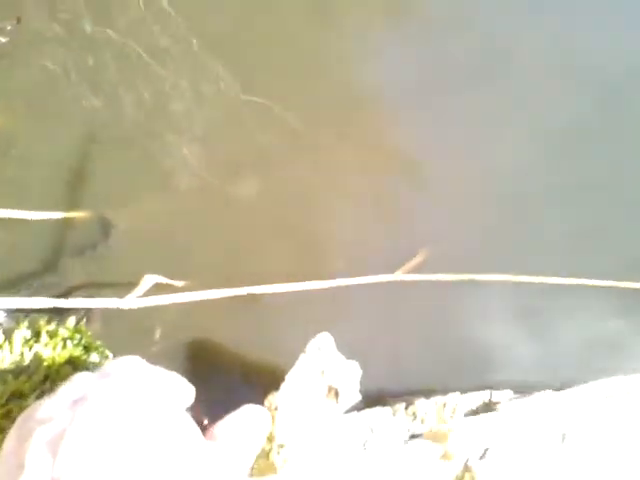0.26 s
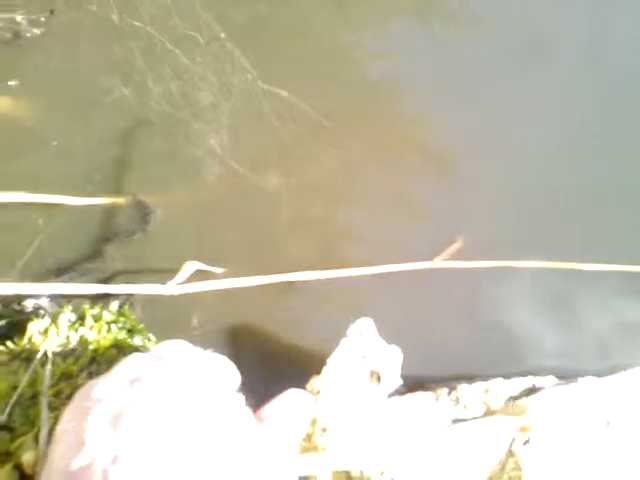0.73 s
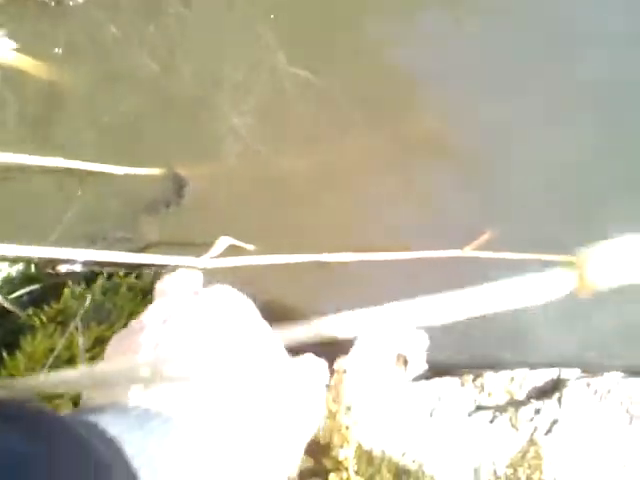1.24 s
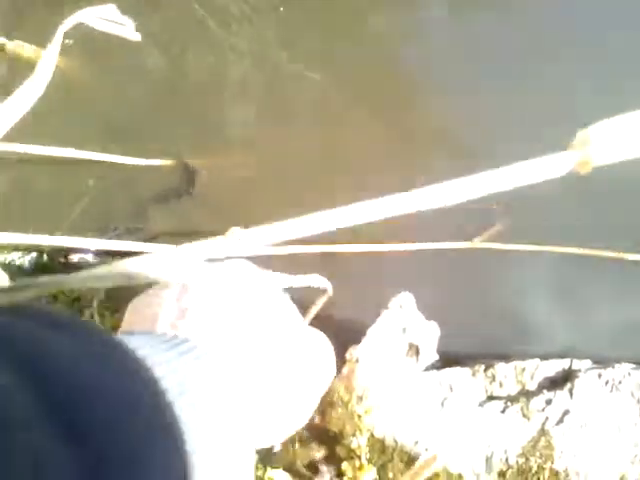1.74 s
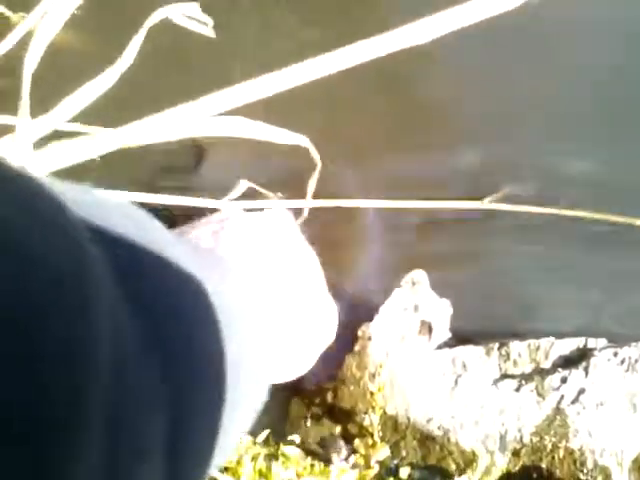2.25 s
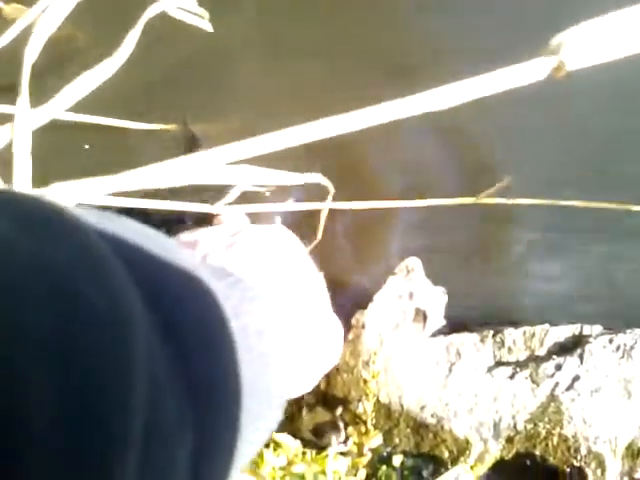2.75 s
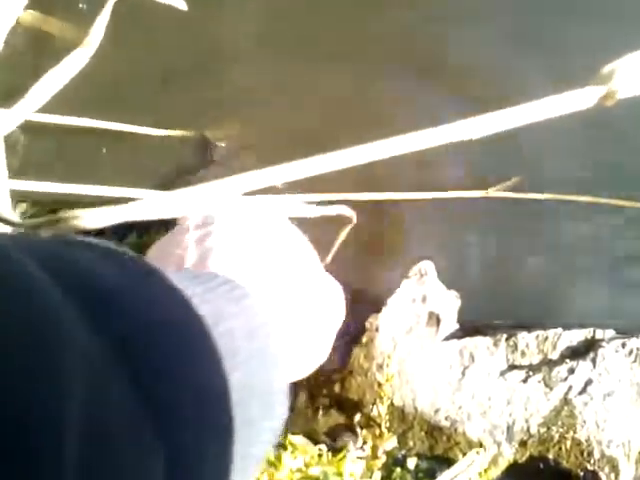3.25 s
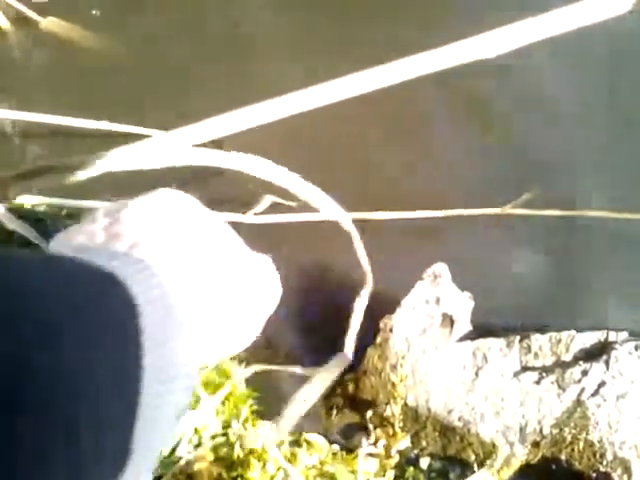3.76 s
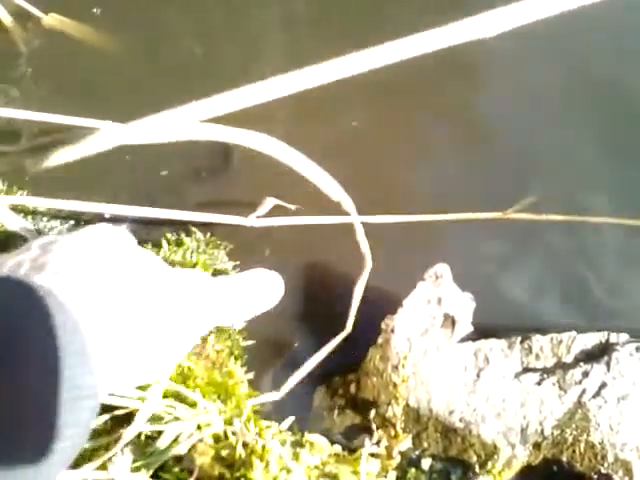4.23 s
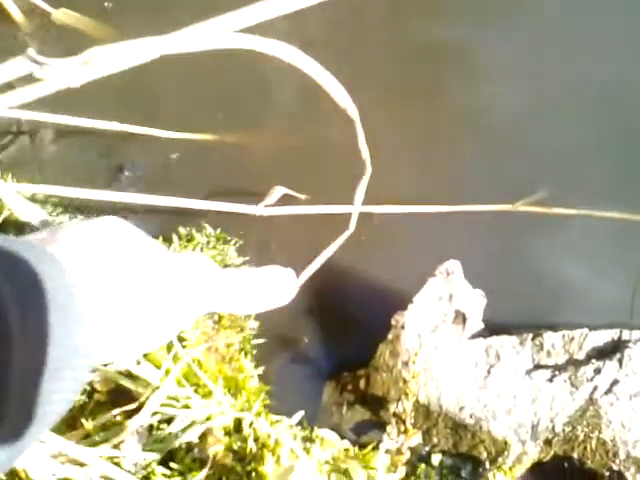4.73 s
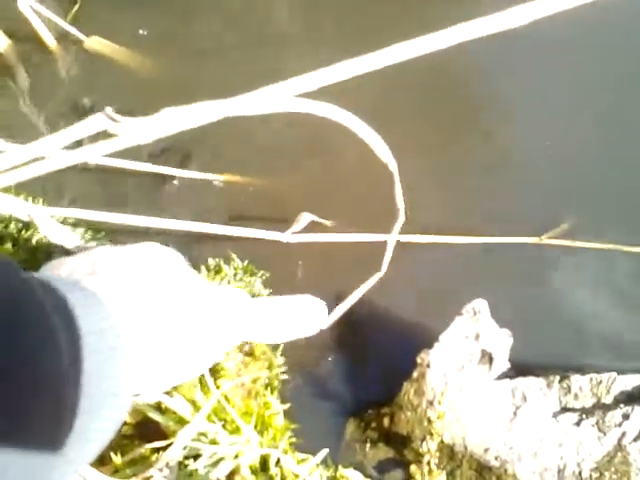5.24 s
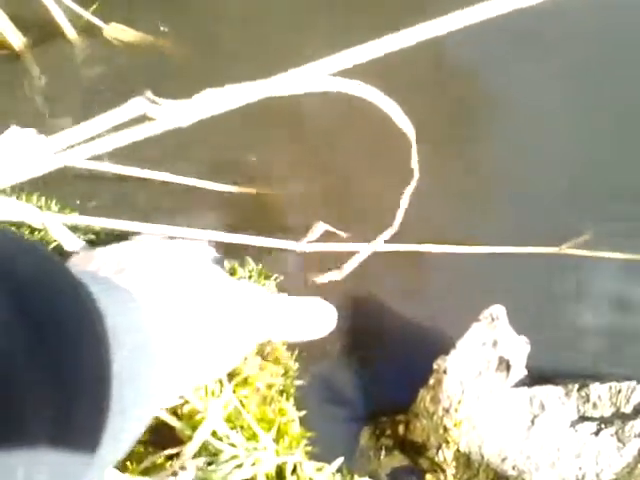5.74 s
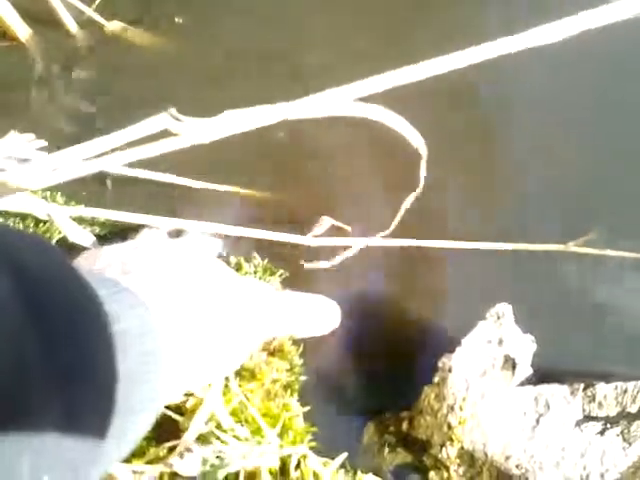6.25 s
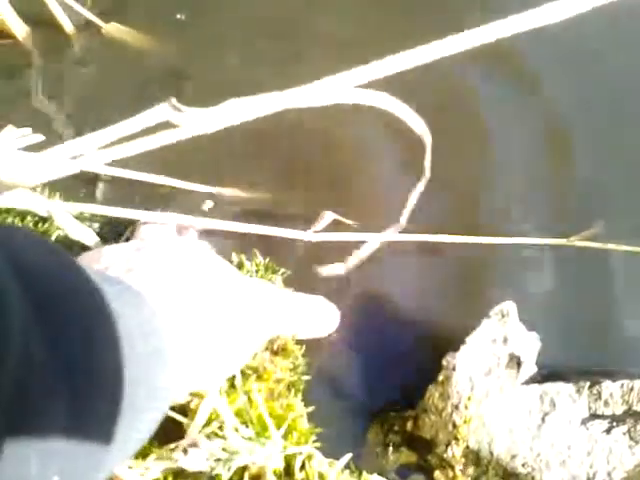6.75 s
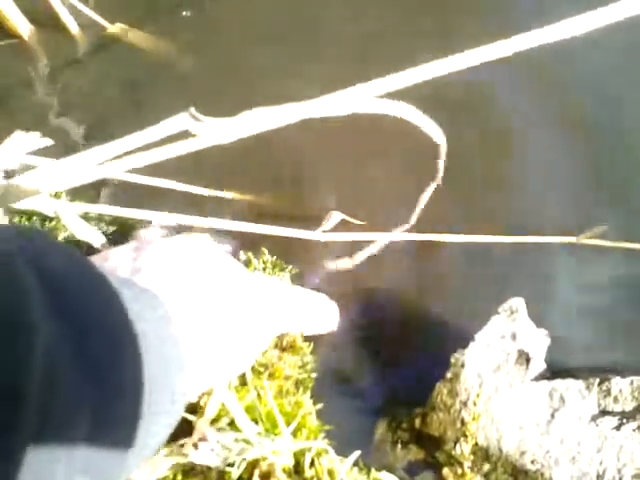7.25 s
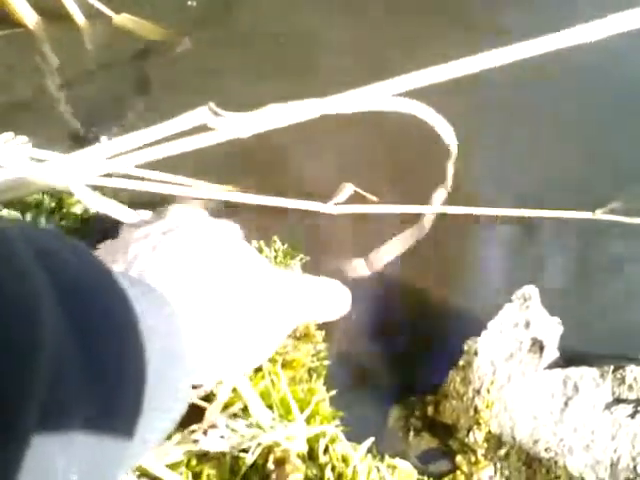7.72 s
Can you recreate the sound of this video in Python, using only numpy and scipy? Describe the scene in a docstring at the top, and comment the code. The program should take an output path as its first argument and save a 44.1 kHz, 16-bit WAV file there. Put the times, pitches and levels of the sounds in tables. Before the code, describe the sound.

Close, busy rustling of dry leaves and cloth opens the scene, with one especially sharp stem snap and a cluster of taps on the device body. Then frogs croak continuously, each a low, rapid, rounded rattle, nearer ones overlapping a blurred chorus farther off. Occasional plips of water and dry ticks punctuate them. The place is a calm garden pond with soft background hush, heard through a slightly dull handheld microphone.

```python
"""First a hand rustles through dry plants while sparrows chirp far off; then frogs purr in a pond.
Each croak is a quick train of soft knocks, each a short pulse followed by a ringing vocal sac.
A low purring blur thickens the opening rustle and later is farther frogs.
Noise gives the garden hush, breeze and rustle; short wave packets are the snapping stems.
Damped rings are the drips and the finger taps; stacks of harmonics are the chirps."""
import sys
import numpy as np
from scipy import signal
from scipy.fft import rfft, irfft
from scipy.io import wavfile
from scipy.ndimage import uniform_filter1d

SR = 44100
rng = np.random.default_rng(int(sys.argv[2]) if len(sys.argv) > 2 else 0)


def unload_wav(signal):
    """Save mono or channel-first audio to the path in sys.argv[1] as 16-bit WAV at rate SR, clipped to [-1, 1]."""
    wavfile.write(
        sys.argv[1],
        SR,
        np.round(np.clip(np.atleast_2d(signal).T, -1, 1) * 32767).astype(np.int16),
    )


N = 352359  # length in samples, about 8 s


def gain_of(db):
    """Turns decibels into a plain multiplier."""
    return 10 ** (np.asarray(db) / 20)


def evened(x):
    """Scales a sound to an average (rms) strength of 1."""
    return x / np.sqrt(np.mean(x ** 2) + 1e-20)


def follow(rows, axis):
    """Draws straight lines through one column of a table, giving a value for every sample."""
    rows = np.array(rows)
    return np.interp(np.arange(N) / SR, rows[:, 0], rows[:, axis])


def add(mix, start_s, sound):
    """Mixes a sound in at a given second."""
    part = mix[max(round(start_s * SR), 0):][:len(sound)]
    part += sound[:len(part)]


def coloured(x, points):
    """Filters x through a curve of level against frequency, then scales it to rms 1."""
    point_hz, point_db = np.transpose(points)
    hz = np.fft.rfftfreq(len(x), 1 / SR)
    db = np.interp(np.log(hz + 1), np.log(point_hz + 1), point_db)
    return evened(irfft(rfft(x) * gain_of(db), len(x)))


def decay(t, t60):
    """A fade that loses 60 dB in t60 seconds."""
    return gain_of(-60 * t / t60)


def ring(hz, t60, rise_s, glide=0.):
    """A damped ring with a soft start and a peak envelope of 1; its pitch can drift as it dies."""
    t = np.arange(round(2 * t60 * SR) + 20) / SR
    shape = (1 - np.exp(-t / rise_s)) * decay(t, t60)
    return shape / shape.max() * np.sin(2 * np.pi * hz * t * (1 + glide * t / t60))


# Colour of the garden hush. Each row: frequency in Hz, relative level per Hz in dB.
GARDEN_COLOUR = [(20, -11), (60, -4), (130, -4), (250, -3), (450, -7), (1000, -12.5), (1650, -7.5),
                 (2000, -14), (2500, -31), (4000, -24), (6200, -28), (7300, -30)]
# Strength of the breeze. Each row: time in seconds, level in dB before the gusts.
BREEZE_LEVEL = [(0, -57.5), (.98, -46), (1.3, -53), (3.6, -53.5), (4.7, -54), (5.5, -58), (5.75, -52),
                (6.27, -59), (6.5, -56), (7.4, -54.5), (7.99, -46.5)]
# Colour of the breeze's rumble. Each row: frequency in Hz, relative level per Hz in dB.
RUMBLE_COLOUR = [(10, -0.5), (25, -7.5), (60, -6), (110, -16), (250, -39)]
GARDEN_DB, HUSH_SWELL_DB = -48.5, 0.42  # usual level, typical swing around it
GUST_DB = 1  # typical swing of the gusts


def garden():
    """Far traffic, air and microphone hiss as one swelling noise; a breeze rumbles at the microphone."""
    swell = evened(uniform_filter1d(rng.standard_normal(N), 8000))
    hush = gain_of(GARDEN_DB + HUSH_SWELL_DB * swell) * coloured(rng.standard_normal(N), GARDEN_COLOUR)
    gusts = evened(uniform_filter1d(uniform_filter1d(rng.standard_normal(N), 4000), 4000))
    breeze = gain_of(follow(BREEZE_LEVEL, axis=1) + GUST_DB * gusts)
    return hush + breeze * coloured(rng.standard_normal(N), RUMBLE_COLOUR)


# Level of a low purring blur: under the opening rustle it thickens the sleeve's scrape, later it
# is farther frogs. Each row: time in seconds, level in dB.
BLUR_LEVEL = [(0, -83), (.29, -43.5), (.7, -41.5), (.9, -58), (1.8, -51), (2.2, -52.5), (2.67, -76),
              (3.05, -59.5), (3.83, -66.5), (4.6, -49.5), (5.09, -49.5), (5.5, -48), (5.67, -62),
              (6.45, -51.5), (6.7, -45.5), (7.25, -59), (7.37, -46), (7.48, -89), (7.99, -49.5)]


def purring_blur(count=7):
    """Several trains of frog-like knocks, each with its own pitch and pace, swell and fade."""
    out, t = np.zeros(N), np.arange(N) / SR
    for pick, (pace, pitch, phase, turn) in enumerate(rng.random((count, 4))):
        # a knock falls each time this count, with its slow wobble, reaches a new whole number
        knock_count = t * (22 + 16 * pace) + 1.5 * np.sin(2 * np.pi * (.3 * t + phase))
        beats = np.diff(np.floor(knock_count), prepend=0) > 0
        breath = 0.12 + 1.9 * np.sin(np.pi * (t * (.5 + 0.382 * turn) + phase)) ** 2
        hz = 450 + 190 * (pick + pitch) / count
        out += signal.oaconvolve(beats * breath, knock(hz, 0.037, sac_db=0.5))[:N]
    return gain_of(follow(BLUR_LEVEL, axis=1)) * evened(out)


# One table a chirp. Each row: time in seconds, level in dB, pitch of the strong harmonic in Hz,
# level of the neighbouring harmonics in dB.
CHIRP_CURVES = [
    [(.012, -46, 2870, -9), (.026, -43, 2990, -20), (.036, -63, 2640, -6), (.062, -55, 3080, -8)],
    [(.184, -51, 2460, 0), (.198, -42, 3240, -14), (.208, -50.5, 3380, -13), (.226, -52, 3020, 2)],
    [(5.022, -51, 2870, -1), (5.04, -50, 3105, -2), (5.064, -43, 3236, -16), (5.078, -46, 2820, -6),
     (5.092, -45, 2440, -17)],
    [(7.912, -56, 3150, 4), (7.93, -54, 3320, 2), (7.955, -50.5, 3330, 2), (7.97, -44, 3440, -17),
     (7.988, -49, 2920, -6)],
]
# For each chirp: which harmonic, counted from 1, carries the pitch.
STRONG_HARMONIC = [8, 8, 4, 9]
# For each neighbour: how many harmonics it lies above the strong one (minus means below).
NEIGHBOUR_STEPS = (-1, 1, 2, 3)
# For each neighbour, in the same order: its level in dB, added to the chirp's own column.
NEIGHBOUR_LEVELS = [-6.5, -4, -9, -10]


def sparrows():
    """A harsh whistle, one harmonic standing out of a stack of weaker ones, smeared by echoes."""
    out = np.zeros(N)
    for rows, order in zip(CHIRP_CURVES, STRONG_HARMONIC):
        times, *columns = np.transpose(rows)
        t = np.arange(times[0], times[-1], 1 / SR)
        db, hz, stack_db = (np.interp(t, times, column) for column in columns)
        turn = 2 * np.pi * np.cumsum(hz) / SR / order  # phase of the lowest harmonic
        stack = sum(gain_of(side_db) * np.sin((order + step) * turn)
                    for step, side_db in zip(NEIGHBOUR_STEPS, NEIGHBOUR_LEVELS))
        # an unsteady voice
        rasp = 1 + .4 * evened(uniform_filter1d(rng.standard_normal(4000), 80))[:len(t)]
        tone = rasp * (np.sin(order * turn) + gain_of(stack_db) * stack)
        add(out, times[0], np.sqrt(2) * tone * gain_of(db) * signal.windows.tukey(len(t), .3))
    echoes = rng.standard_normal(6000) * decay(np.arange(6000) / SR, .3)
    echoes = echoes / np.linalg.norm(echoes)
    return out + gain_of(-2.0) * signal.oaconvolve(out, echoes)[:N]


# Drips. Each row: start in seconds, peak level in dB, nominal pitch in Hz,
# time to fade by 60 dB in seconds.
DRIP_RINGS = [(2.159, -30.5, 1100, 0.018), (2.492, -35, 1760, 0.019), (2.5168, -37, 2070, 0.032),
              (2.6522, -26, 1550, 0.018), (2.724, -22.5, 1150, 0.037), (3.05, -27, 2020, 0.011),
              (4.296, -35, 1400, 0.03), (4.589, -30, 1560, 0.01), (6.691, -21, 635, 0.033),
              (7.4198, -39, 1720, 0.061), (7.441, -18, 1562, 0.031), (7.9552, -21.5, 1197, 0.041)]


def drips():
    """Each drip traps an air bubble, which rings and rises slightly in pitch."""
    out = np.zeros(N)
    for s, db, hz, t60 in DRIP_RINGS:
        # starting a little under the nominal pitch
        add(out, s, gain_of(db) * ring(0.989 * hz, t60, 0.00026, glide=0.08))
    return out


# Faint lasting rustle. Each row: time in seconds, crackle of dry leaves in dB, scrape of the sleeve in dB.
LASTING_RUSTLE = [(0, -53, -50.5), (.75, -53.5, -48), (.85, -56.5, -54), (1.55, -60.5, -55),
                  (2.1, -57, -54), (2.35, -58.5, -56), (3.3, -60, -58), (3.85, -56, -52),
                  (4.05, -57, -56.5), (4.22, -62, -58.5), (4.9, -63.5, -58), (7, -64.5, -56.5),
                  (7.4, -62, -56.5), (7.99, -67, -58)]
# Sweeps through the plants. Each row: middle in seconds, half length (standard deviation of
# the bell shape) in seconds, leaves in dB, sleeve in dB.
HAND_SWEEPS = [(0.028, 0.048, -51.5, -39), (.15, .025, -50, -49), (0.23, 0.024, -47, -58),
               (0.301, 0.017, -42.5, -38.5), (0.353, 0.027, -52.5, -43.5), (.435, .035, -49.5, -38),
               (0.571, 0.044, -40.5, -34), (0.628, 0.016, -41.5, -44), (0.692, 0.05, -49.5, -44.5),
               (0.935, .025, -46, -51), (1.033, 0.037, -43, -47), (1.213, 0.1, -49.5, -53),
               (1.271, 0.0069, -41, -43), (1.44, .018, -45, -47), (2, 0.06, -55.5, -51.5),
               (4.344, 0.034, -48.5, -48.5), (5.815, 0.017, -53.5, -58)]


def hand(axis):
    """Strength of the leaves (1) or the sleeve (2): bell-shaped sweeps over the lasting rustle."""
    t = np.arange(N) / SR
    power = gain_of(follow(LASTING_RUSTLE, axis=axis)) ** 2
    for row in HAND_SWEEPS:
        bell = np.exp(-.5 * ((t - row[0]) / row[1]) ** 2)
        power += (gain_of(row[axis + 1]) * bell) ** 2
    return np.sqrt(power)


# Colour of the dry leaves. Each row: frequency in Hz, relative level per Hz in dB.
LEAF_COLOUR = [(1500, -18), (2500, -6.5), (3500, -0.5), (5000, 3), (6300, 8.5), (7300, 2.5), (8000, -40)]
# Colour of the scraping sleeve. Each row: frequency in Hz, relative level per Hz in dB.
SLEEVE_COLOUR = [(250, -26.5), (400, -6.5), (500, 0.5), (620, -12), (780, 0.5), (1000, -2.5), (1300, -7.5),
                 (2200, -9), (3200, -7.5), (4200, -17), (6000, -50.5)]
CRACKS_PER_S = 900  # on average


def rustle():
    """Tiny cracks of unequal size in a flickering hiss of leaves, and a lumpy scrape of cloth."""
    crack_sizes = gain_of(4.0 * np.minimum(rng.exponential(1, N), 4.5))
    cracks = crack_sizes * (rng.random(N) < CRACKS_PER_S / SR)
    flicker, lumps = (evened(uniform_filter1d(z, 350)) for z in rng.standard_normal((2, N)))
    crackle = .5 * evened(cracks * rng.standard_normal(N))
    leaves = crackle + gain_of(3.4 * flicker) * rng.standard_normal(N)
    sleeve = gain_of(1.6 * lumps + 1.0 * flicker) * rng.standard_normal(N)
    return hand(axis=1) * coloured(leaves, LEAF_COLOUR) + hand(axis=2) * coloured(sleeve, SLEEVE_COLOUR)


TWIGS_PER_S = 30
TWIG_OVER_DB, TWIG_SPREAD_DB = 21, 4  # level above the leaves' strength, and its random scatter
TWIG_HZ, TWIG_SCATTER_HZ, TWIG_WIDTH_HZ = 4670, 800, 2300  # usual centre, its scatter, spread


def twigs():
    """Rows of small snaps at random moments, louder when the hand stirs the leaves more."""
    count = round(TWIGS_PER_S * N / SR)
    times = rng.random(count) * (N - 1) / SR
    level_luck, pitch_luck = rng.standard_normal((count, 2)).T
    leaves_db = 20 * np.log10(hand(axis=1)[(times * SR).astype(int)])
    db = leaves_db + TWIG_OVER_DB + TWIG_SPREAD_DB * level_luck
    return list(zip(times, db, TWIG_HZ + TWIG_SCATTER_HZ * pitch_luck, np.full(count, TWIG_WIDTH_HZ)))


# Snapping stems. Each row: middle of the snap in seconds, level in dB, centre pitch in Hz,
# frequency spread in Hz (a larger spread makes a shorter snap).
STEM_SNAPS = [(0.1502, -22.5, 3640, 1770), (0.1808, -22, 4440, 1640), (0.2262, -21.5, 5310, 1280),
              (0.2655, -20, 4850, 1560), (0.291, -30, 5120, 1310), (0.2993, -8.5, 5800, 1040),
              (0.3013, -25, 4850, 1620), (0.3353, -15, 5660, 670), (0.341, -1, 4200, 1550),
              (0.347, -22, 4990, 1350), (0.449, -21.5, 5000, 1570), (0.5722, -26, 4650, 1850),
              (0.603, -10, 5330, 1250), (0.619, -12, 5510, 1620), (0.62, -18, 5290, 1660),
              (0.6771, -23, 4830, 1800), (0.91, -22.5, 5570, 1330), (0.9694, -21, 5600, 1310),
              (0.9868, -18, 4490, 1360), (1.0493, -29, 6000, 1470), (1.088, -23.5, 5450, 1210),
              (1.1924, -22, 4830, 1270), (1.2013, -7.5, 4950, 1310), (1.2766, -21, 4620, 1620),
              (1.483, -21, 3720, 1720), (1.9972, -25, 2940, 1730), (2.1543, -24.5, 4660, 1240),
              (2.1897, -20.5, 3830, 2180), (2.4675, -17.5, 4600, 380), (2.7412, -27.5, 6150, 910),
              (3.4753, -15, 4300, 1250), (4.8954, -18.5, 4160, 1910), (5.3158, -30.5, 5450, 1310),
              (6.6976, -22, 4880, 1040), (6.7, -20.5, 3100, 1650), (6.943, -31, 5020, 520),
              (7.2299, -23, 3050, 680), (7.4199, -17.5, 5870, 520), (7.4328, -23, 4640, 1050),
              (7.4415, -22, 3850, 1860), (7.4481, -12, 5560, 1610)]


def snaps():
    """A brief wave packet, shorter the wider it spreads, and a faint noisy tail of the same colour."""
    out, t = np.zeros(N), np.arange(-100, 101) / SR
    rows = twigs() + STEM_SNAPS
    for (s, db, hz, spread_hz), noise in zip(rows, rng.standard_normal((len(rows), 500))):
        crack = np.exp(-(2 * np.pi * spread_hz * t) ** 2) * np.sin(2 * np.pi * hz * t + .8)
        tail = .04 * noise * decay(np.arange(500) / SR, .015)
        add(out, s + t[0], gain_of(db) * crack)
        add(out, s + t[0], gain_of(db) * np.convolve(tail, crack))
    return out


# Finger taps. Each row: start in seconds, level in dB.
FINGER_TAPS = [(.3110, -23.5), (.7997, -21), (.8197, -29), (.8456, -11), (.8670, -23), (.8822, -24.5),
               (1.0170, -26), (1.0470, -29), (1.2690, -33), (4.8945, -23.5)]
# Ways the plastic body vibrates. Each row: pitch in Hz, level in dB added to the tap's,
# time to fade by 60 dB in seconds.
BODY_MODES = [(528, -14.5, 0.017), (812, -3, 0.0061), (1390, -5, 0.0025), (1940, -8, 0.0017)]


def taps():
    """Fingers tap a plastic body; each tap rings all its ways of vibrating at once."""
    out = np.zeros(N)
    for s, db in FINGER_TAPS:
        for hz, mode_db, t60 in BODY_MODES:
            add(out, s, -gain_of(db + mode_db) * ring(hz, t60, 0.0013))
    return out


def knock(hz, t60, sac_db, cycles=1.28, sag=0.065, octave_db=-11, overtone_db=-19):
    """A pulse of two or three cycles, then the sac rings on a little lower, with a weak octave."""
    t = np.arange(1600) / SR
    swell = t * hz / cycles  # 1 at the height of the pulse
    shape = (swell * np.exp(1 - swell)) ** 4
    pulse = shape * np.sin(2 * np.pi * hz * t * (1.18 - sag * swell))  # pitch sags as the pulse dies
    overtone = gain_of(overtone_db) * shape ** 2 * np.sin(2 * np.pi * 2.71 * hz * t)
    overtone += gain_of(octave_db - 6) * shape * np.sin(2 * np.pi * 2.17 * hz * t)
    rise = 1 - np.exp(-(swell / 2.72) ** 2)
    fade = rise * gain_of(sac_db) * decay(t, np.clip(t60, .01, .12))
    turn = 2 * np.pi * .93 * hz * t + 1.5  # the ring falls in step with the middle of the pulse
    sac = fade * (np.sin(turn) + gain_of(octave_db - 3) * np.sin(2 * turn))
    return (pulse + overtone + sac) * signal.windows.tukey(len(t), .02)


# One table a croak, at its turning points. Each row: time in seconds, usual knock level in dB,
# nominal pulse pitch in Hz.
CROAK_CURVES = [
    [(0.035, -35.5, 555), (0.137, -34, 540), (0.236, -36, 530)],
    [(1.084, -36, 523), (1.245, -29.5, 530), (1.323, -25, 545), (1.482, -22.5, 547), (1.654, -25.5, 518),
     (1.826, -23, 567), (1.991, -24.5, 558), (2.069, -20, 607), (2.147, -21, 572), (2.221, -25, 574)],
    [(1.258, -43, 565), (1.39, -34, 593), (1.456, -45, 565)],
    [(1.745, -35, 580), (1.924, -28, 596), (2.012, -25.5, 620)],
    [(2.104, -35, 618), (2.293, -33, 610), (2.489, -32.5, 538), (2.59, -32, 550), (2.704, -38.5, 555)],
    [(2.231, -43, 352), (2.43, -44.5, 367), (2.528, -44, 356)],
    [(2.774, -37, 510), (2.893, -35, 510), (3.013, -31, 520), (3.126, -30, 505), (3.235, -32, 513),
     (3.392, -36.5, 513)],
    [(3.422, -35, 555), (3.524, -28.5, 483), (3.627, -29.5, 544), (3.737, -29.5, 577), (3.851, -30.5, 535),
     (4.003, -30, 535)],
    [(3.392, -41, 515), (3.572, -33.5, 520), (3.661, -31, 540), (3.79, -39, 510)],
    [(4.016, -35.5, 504), (4.101, -28, 486), (4.186, -31.5, 494), (4.273, -28.5, 536), (4.345, -29.5, 500),
     (4.421, -37.5, 520), (4.465, -39, 533)],
    [(4.49, -34, 510), (4.696, -29.5, 490), (4.799, -29.5, 520), (5.006, -30.5, 486), (5.112, -34.5, 534)],
    [(4.576, -42, 527), (4.671, -36, 500), (4.765, -46, 526)],
    [(5.129, -36.5, 457), (5.327, -31, 410), (5.435, -36.5, 407), (5.543, -31.5, 443), (5.653, -34.5, 500)],
    [(5.634, -34.5, 580), (5.841, -35, 606), (5.939, -34, 600), (6.159, -38.5, 610)],
    [(6.12, -41, 556), (6.23, -33, 555), (6.332, -40, 540)],
    [(6.367, -31, 530), (6.495, -35, 515), (6.619, -36, 520), (6.744, -39, 500)],
    [(6.108, -34.5, 533), (6.22, -32.5, 560), (6.32, -30.5, 550), (6.511, -29, 548), (6.608, -29.5, 530),
     (6.709, -43, 523)],
    [(6.754, -37.5, 475), (6.898, -31.5, 467), (7.044, -29.5, 463), (7.185, -30.5, 490)],
    [(7.152, -42, 607), (7.236, -31.5, 616), (7.409, -34, 654)],
    [(7.802, -43, 450), (7.883, -35.5, 484), (7.961, -36, 470)],
]
# One entry a croak: which of its knocks, counted from 0, falls on each row of its curve.
KNOCK_NUMBERS = [(0, 3, 6), (0, 6, 9, 15, 21, 27, 33, 36, 39, 42), (0, 4, 6), (0, 6, 9), (0, 6, 12, 15, 18),
                 (0, 6, 9), (0, 3, 6, 9, 12, 17), (0, 3, 6, 9, 12, 16), (0, 4, 6, 9),
                 (0, 3, 6, 9, 12, 15, 17), (0, 6, 9, 15, 18), (0, 3, 6), (0, 6, 9, 12, 15), (0, 6, 9, 15),
                 (0, 3, 6), (0, 3, 6, 9), (0, 3, 6, 12, 15, 18), (0, 3, 6, 9), (0, 3, 9), (0, 3, 6)]
# The vocal sac behind each croak. Each row: time to fade by 60 dB in seconds, usual ring setting
# against the pulse in dB, octave setting in dB (knock() lowers the octave further).
VOCAL_SACS = [(0.046, -1, -15), (0.035, -1, -12), (.04, -9, -11), (0.038, 0.5, -15), (0.048, 4, -6),
              (0.11, 8, -13), (0.064, 0, -6), (0.056, -2.5, -12), (0.052, -3, -16), (0.027, 8, -11),
              (0.07, -8, -10.5), (0.077, -1, -14), (0.057, -7, -6.5), (0.044, 0, -13), (.047, -5, -15),
              (0.045, -9, -12), (0.049, 2.5, -9), (0.037, 2.5, -3.5), (0.031, -4, -7), (0.068, -5, -11)]
SAC_SPREAD_DB = 2.5  # random scatter of the ring from knock to knock
SAC_PER_DB = -0.5  # dB of ring per dB of effort: harder knocks leave the ring behind


def croaks():
    """The pace of the knocks bends smoothly through the rows; each knock is a little uneven."""
    out = np.zeros(N)
    for rows, place, (t60, sac_db, octave_db) in zip(CROAK_CURVES, KNOCK_NUMBERS, VOCAL_SACS):
        row_s, row_db, row_hz = np.transpose(rows)
        usual_db = row_db.mean()
        every = np.arange(place[-1] + 1)
        times = np.polynomial.Polynomial.fit(place, row_s, min(len(row_s) - 1, 7))(every)
        knocks = zip(times, np.interp(every, place, row_db), np.interp(every, place, row_hz))
        luck = rng.standard_normal((len(every), 3))
        for (s, db, hz), (level_luck, pitch_luck, ring_luck) in zip(knocks, luck):
            ring_db = sac_db + SAC_PER_DB * (db - usual_db) + SAC_SPREAD_DB * ring_luck
            sound = knock(hz * (1 + 0.036 * pitch_luck), t60, ring_db, octave_db=octave_db)
            # start early, so that the height of the pulse falls near its time
            add(out, s - 1.387 / hz, gain_of(db + level_luck) * sound)
    return out


def scene():
    """All sources added together at one microphone."""
    background = garden() + purring_blur() + sparrows()
    nearby = drips() + rustle() + snaps() + taps()
    return (background + nearby + croaks())[None]


OFFSET = -.0165  # constant shift of the whole wave, full scale being 1
SLOPE_HZ, EDGE_HZ = 7440, 8200  # where the top end slopes away, and where the band ends


def record(dry):
    """A converter slopes off the top end, limits the band and adds a small constant offset."""
    slope = signal.firwin(121, SLOPE_HZ, window="blackman", fs=SR)
    edge = signal.firwin(511, EDGE_HZ, window=("kaiser", 9), fs=SR)
    return OFFSET + signal.oaconvolve(dry, np.convolve(slope, edge)[None], "same")


dry = scene()
out = record(dry)
unload_wav(out)
```